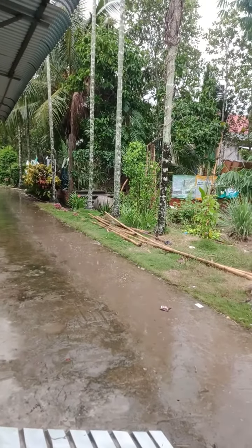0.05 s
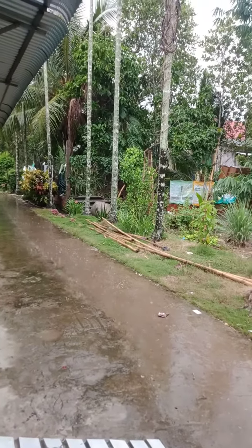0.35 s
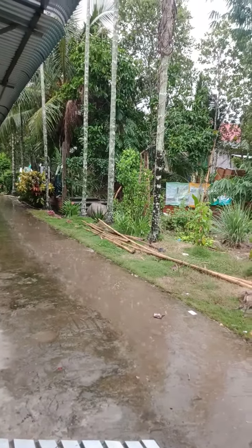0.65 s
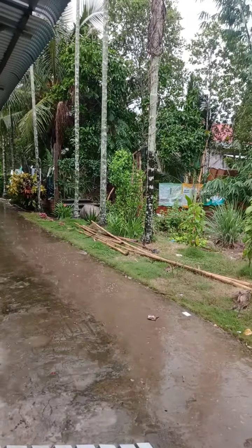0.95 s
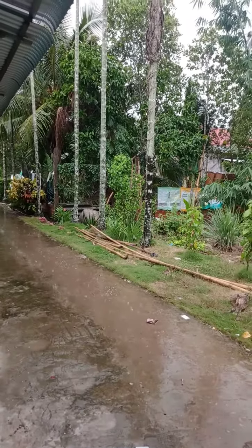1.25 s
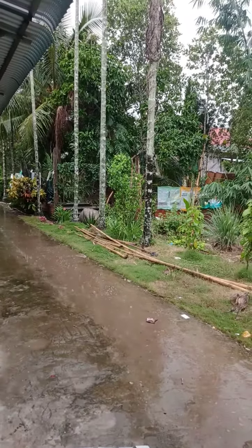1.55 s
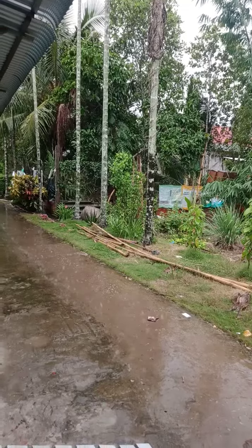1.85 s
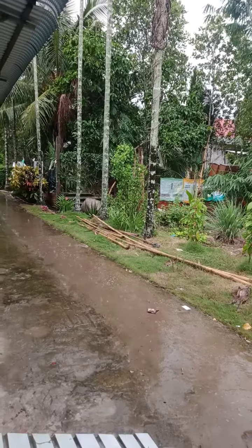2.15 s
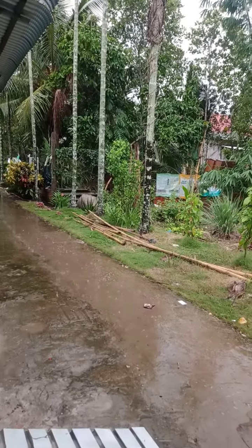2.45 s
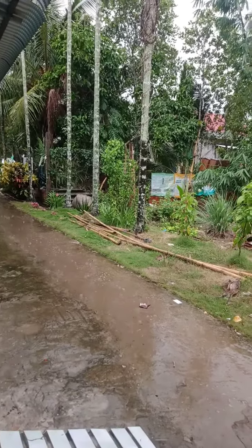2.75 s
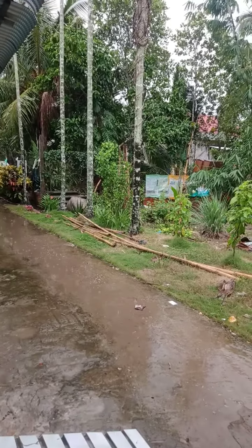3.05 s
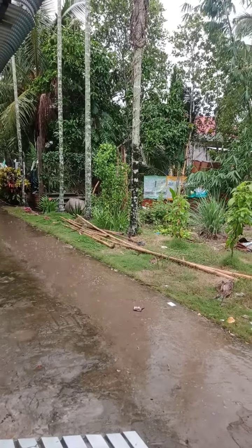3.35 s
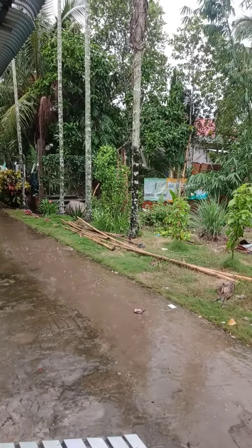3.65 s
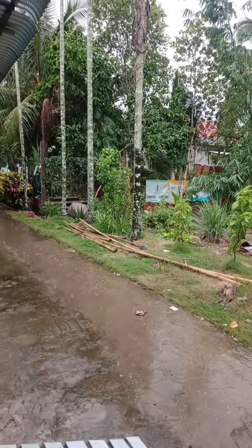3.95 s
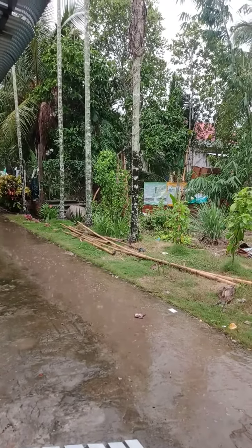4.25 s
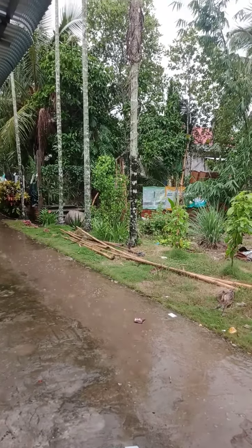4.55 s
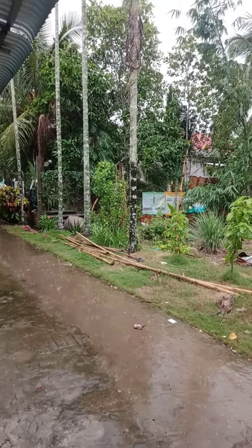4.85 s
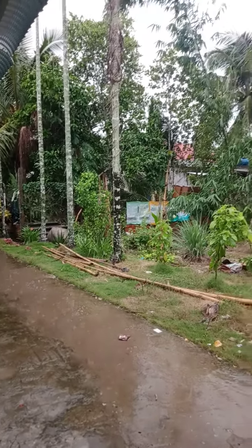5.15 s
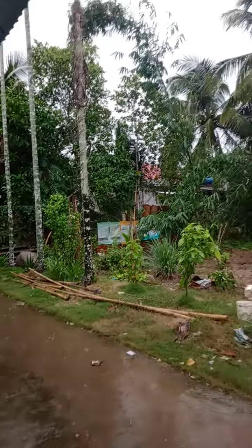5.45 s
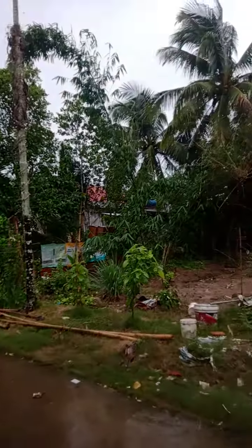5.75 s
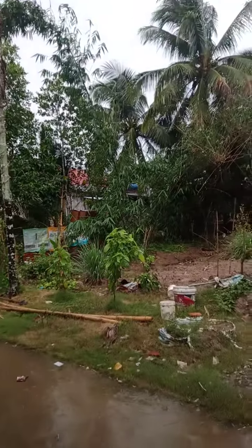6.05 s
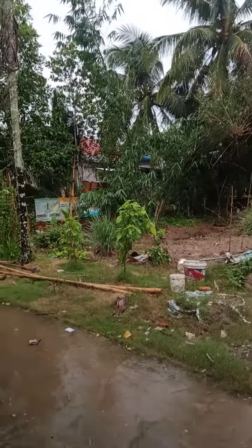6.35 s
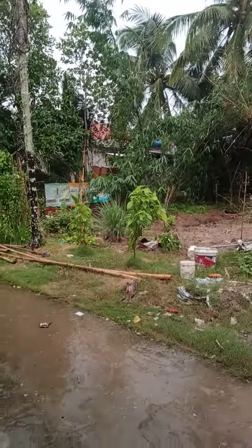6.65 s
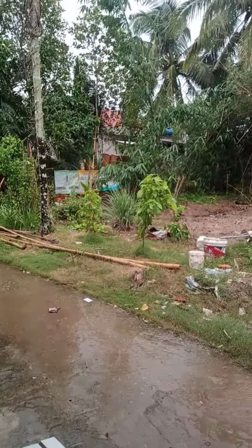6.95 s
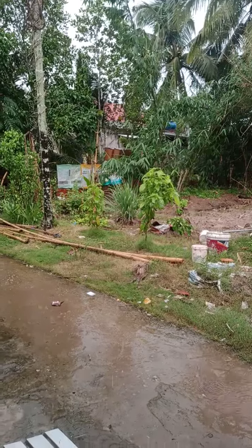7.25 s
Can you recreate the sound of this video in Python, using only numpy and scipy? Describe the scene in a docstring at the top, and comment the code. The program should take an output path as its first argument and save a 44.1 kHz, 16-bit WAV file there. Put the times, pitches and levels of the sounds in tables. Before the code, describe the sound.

From beneath the edge of a metal roof, a shower makes a dense, lightly ringing patter throughout. Heavier drips strike the sheet and burst into spray. Out in the yard, rain hisses gently on leaves and wet paving, and occasional drops plink into standing water. A little past halfway, three soft, dull booms rise out of a faint rumble and fade as the rain carries on.

```python
"""Steady rain drumming on a corrugated metal roof, heard from under its edge, facing a wet yard.
Countless small drops tap the sheet, which rings broadly near 2 kHz; fat drips land on it and spatter.
Behind them lies the wash of rain on ground and leaves, with fine splashes on the puddles,
a few plinks in standing water and a low rumble that swells into three soft booms."""
import sys
import numpy as np
from scipy import signal
from scipy.fft import rfft, irfft
from scipy.io import wavfile

SR = 44100
rng = np.random.default_rng(int(sys.argv[2]) if len(sys.argv) > 2 else 0)


def dump_mix(stems):
    """Bounce the given channels to the path in sys.argv[1] as a 16-bit WAV at rate SR."""
    frames = np.atleast_2d(stems).T  # one column per channel
    limited = np.clip(frames, -1, 1)  # hard clip at full scale
    pcm = np.round(limited * 32767).astype(np.int16)
    wavfile.write(sys.argv[1], SR, pcm)


N = 325899
TIME = np.arange(N) / SR
BIN_HZ = np.fft.rfftfreq(N, 1 / SR)


# small-drop impact spectrum: f/Hz, level/dB
IMPACT_SPECTRUM = [(100, -28.5), (400, -10), (1350, 2.5), (2700, -.5), (4000, -5), (5300, -14.5),
                   (6500, -17), (8400, -26.5), (9700, -39), (12200, -51), (13700, -42), (16000, -46.5)]
# drop classes: rate/(1/s), size spread/dB, ring/dB, impact/dB, sheet t60/s
DROP_CLASSES = [(6996, 1.4, -25, -30, 0.12), (495, 2.9, -29.5, -37.5, 0.21)]

def roof(rain_db, panels=20):
    """Drops strike several panels; each gives a short tap and that panel's longer shiver."""
    ring, impact = np.zeros((2, N))
    for per_s, spread_db, ring_db, impact_db, t60_s in DROP_CLASSES:
        rings, taps = np.zeros((2, N))
        for _ in range(panels):
            drops = patter(per_s / panels, spread_db)
            rings += signal.oaconvolve(drops, shiver(t60_s, rise_s=0.00036))[:N]
            taps += signal.oaconvolve(drops, shiver(t60_s=0.038, rise_s=0.00042))[:N]
        ring += from_db(ring_db) * unit(rings)
        impact += from_db(impact_db) * unit(taps)
    return (colour(ring, sheet_gain()) * from_db(1.16 * rain_db)
            + colour(impact, spectrum(IMPACT_SPECTRUM)) * from_db(0.62 * rain_db))


# roof sheet resonances: f/Hz, width/Hz, level/dB
SHEET_MODES = [(1995, 165, 1.5), (2150, 110, -4), (1800, 415, -3.5), (2440, 430, -10.3), (3660, 660, -18)]

def sheet_gain(damping_hz=4000):
    """Broad resonances of the corrugated metal, damped by the film of water."""
    hz = BIN_HZ + 1
    power = 0
    for mode_hz, width_hz, db in SHEET_MODES:
        detuning = (hz ** 2 - mode_hz ** 2) / (hz * width_hz)
        power += from_db(db) ** 2 / (1 + detuning ** 2)
    return np.sqrt(power / (1 + (hz / damping_hz) ** 10))


# fattest drips on the roof: t/s, ring/dB, spray/dB
FAT_DRIPS = [(0.274, -16, -33.5), (0.303, -18, -40), (0.482, -22, -36), (0.622, -20, -49),
             (1.055, -19, -40), (1.755, -20, -34.5), (2.128, -27, -36.5), (2.628, -24, -36),
             (3.085, -26, -36), (3.203, -24, -38), (3.365, -29, -38), (4.222, -24, -37), (4.428, -19, -35),
             (4.672, -26, -38), (4.970, -19, -30.5), (5.125, -18, -32.5), (5.251, -17.5, -33),
             (5.345, -27, -33), (5.746, -25, -35), (6.095, -25, -47), (6.16, -23, -45), (6.28, -33, -34),
             (6.515, -20.5, -37), (6.9, -20, -32.5)]
# drip spray spectrum: f/Hz, level/dB
SPRAY_SPECTRUM = [(300, -25), (2000, 3.5), (4300, 11), (5400, 6.5), (6400, 3), (8400, -7.5), (9800, -17.5),
                  (12200, -26), (13800, -17), (16000, -18)]

def drips(lesser_per_s=7, lesser_ring_db=-26, lesser_spray_db=-41):
    """Each drip rings the sheet and bursts into grainy spray; lesser ones fall at random."""
    ring, spray = np.zeros((2, N))
    lesser_times_s = np.flatnonzero(rng.random(N) < lesser_per_s / SR) / SR
    lesser = [(start_s, lesser_ring_db, lesser_spray_db) for start_s in lesser_times_s]
    for start_s, ring_db, spray_db in list(FAT_DRIPS) + lesser:
        add(ring, start_s, from_db(ring_db) * shiver(t60_s=0.25, rise_s=0.0013))
        add(spray, start_s, from_db(spray_db) * shiver(t60_s=0.28, rise_s=0.0012))
    droplets = unit(patter(per_s=17000, spread_db=1.5))
    return colour(ring, sheet_gain()) + colour(spray * droplets, spectrum(SPRAY_SPECTRUM))


# spectrum of rain on ground and leaves: f/Hz, level/dB
WASH_SPECTRUM = [(60, -45), (190, -13.5), (220, -3.5), (600, -1.5), (1200, -0.5), (2800, -3.5),
                 (4000, -16.5), (5200, -26), (8300, -36.5), (9700, -48.5), (12200, -55), (13600, -44.5),
                 (16000, -50)]

def yard(rain_db):
    """Far drops on ground and leaves merge into a soft, slightly restless wash."""
    far_drops = unit(patter(per_s=12000, spread_db=2.0)) * from_db(0.16 * wander(per_s=8))
    return colour(far_drops, spectrum(WASH_SPECTRUM)) * from_db(-25.5 + 0.15 * rain_db)


# spectrum of a slap on wet paving: f/Hz, level/dB
SLAP_SPECTRUM = [(500, -17), (3500, 9.5), (6500, -7), (8400, -6), (9800, -20.5), (12200, -19),
                 (14000, -15), (16000, -17)]

def puddles(rain_db, bubble_sizes=16):
    """Near drops slap the wet paving: a brief splash, with a small bubble that rises in pitch."""
    t = np.arange(SR // 3) / SR
    splashes = np.zeros(N)
    for hz in np.geomspace(3200, 8800, bubble_sizes):
        bubble = np.sin(2 * np.pi * hz * t * (1 + 4 * t)) * np.exp(-t * hz / 24)
        splash = unit(shiver(t60_s=0.07, rise_s=0.00056)) + from_db(-10) * unit(bubble)
        splashes += signal.oaconvolve(patter(per_s=7.4, spread_db=4.5), splash)[:N]
    return unit(colour(splashes, spectrum(SLAP_SPECTRUM))) * from_db(-47 + 1.1 * rain_db)


# drips into standing water: t/s, f/Hz, level/dB
WATER_PLINKS = [(0.482, 6400, -45), (1.347, 6500, -45), (2.868, 4300, -32), (2.925, 3800, -34),
                (4.33, 8050, -52), (5.583, 4430, -34), (5.838, 4630, -35)]

def plinks():
    """A drip into standing water gives a short, bright splash around one pitch."""
    out = np.zeros(N)
    for start_s, hz, db in WATER_PLINKS:
        b, a = signal.iirpeak(hz, Q=4.5, fs=SR)
        burst = shiver(t60_s=0.17, rise_s=0.0017)
        splash = signal.lfilter(b, a, signal.lfilter(b, a, burst))
        add(out, start_s, from_db(db) * splash / np.std(splash[:SR // 50]))
    return out


# rumble spectrum: f/Hz, level/dB
RUMBLE_SPECTRUM = [(15, -40), (35, -30), (48, -23), (70, -7.5), (110, -3.5), (145, 0), (185, -4),
                   (320, -7.5), (900, -36.5), (4000, -75)]
# low booms: t/s, level/dB, t60/s
LOW_BOOMS = [(4.21, -30, 0.67), (4.41, -35, 1.6), (5.36, -36.5, 2.1)]

def rumble(floor_db=-43, boom_rise_s=0.028):
    """A dull, wavering rumble; each boom rises quickly and fades slowly."""
    power = from_db(floor_db + 0.5 * wander(per_s=2.2)) ** 2
    for start_s, db, t60_s in LOW_BOOMS:
        age_s = np.maximum(TIME - start_s, 0)
        attack = np.minimum(age_s / boom_rise_s, 1)
        power += (attack * from_db(db - 60 * age_s / t60_s)) ** 2
    return np.sqrt(power) * colour(rng.standard_normal(N), spectrum(RUMBLE_SPECTRUM))


# rain strength about its mean: t/s, level/dB
RAIN_SURGES = [(0.0, -0.2), (0.3, 0), (0.57, -1.4), (1.07, 1.8), (1.22, -1), (1.42, 1), (1.62, -1.3),
               (2.1, -0.7), (2.32, 1.8), (2.5, -0.5), (2.95, 1.5), (3.7, 0), (4.03, 1.6), (4.3, -0.4),
               (5.3, 0.5), (6.5, 0), (6.8, -1.5), (7.39, -0.6)]

def rainfall(flutter_db=0.49):
    """Strength of the rain in dB: slow surges with a quicker random flutter on top."""
    return np.interp(TIME, *np.transpose(RAIN_SURGES)) + flutter_db * wander(per_s=5)


def patter(per_s, spread_db):
    """Clicks at random moments: many small, a few large."""
    size = from_db(spread_db * np.minimum(rng.exponential(1, N), 4))
    return size * rng.choice([-1, 1], N) * (rng.random(N) < per_s / SR)


def shiver(t60_s, rise_s):
    """Dying noise burst: a splash, or an impact's dense echoes from the sheet's ribs and edges."""
    t = np.arange(SR // 3) / SR
    return rng.standard_normal(len(t)) * (1 - np.exp(-t / rise_s)) * from_db(-60 * t / t60_s)


def wander(per_s):
    """Slow random motion of rms 1, up to about the given rate."""
    lowpass = np.exp(-(BIN_HZ / per_s) ** 2)
    return unit(irfft(rfft(rng.standard_normal(N)) * lowpass, N))


def spectrum(points):
    """Gain per frequency bin from (f/Hz, level/dB) points."""
    hz, db = np.transpose(points)
    return from_db(np.interp(np.log(BIN_HZ + 1), np.log(hz), db))


def colour(x, gain):
    """Minimum-phase filter shaped by the gains; keeps the level of white noise."""
    log_gain = np.log(np.maximum(unit(gain), 1e-5))
    cepstrum = irfft(log_gain, N)
    cepstrum[1:N // 2] *= 2
    cepstrum[N // 2:] = 0
    taps = irfft(np.exp(rfft(cepstrum)), N)[:SR // 10]
    return signal.oaconvolve(x, taps)[:N]


def add(mix, start_s, sound):
    """Mixes a sound in at start_s."""
    part = mix[max(round(start_s * SR), 0):][:len(sound)]
    part += sound[:len(part)]


def from_db(db):
    """Decibels to gain."""
    return 10 ** (np.asarray(db) / 20)


def unit(x):
    """Scales to rms 1."""
    return x / np.sqrt(np.mean(x ** 2) + 1e-20)


def scene():
    """Roof overhead, yard in front, under one shower; mono."""
    rain_db = rainfall()
    return (roof(rain_db) + yard(rain_db) + puddles(rain_db) + rumble() + plinks() + drips())[None]


def record(dry):
    """Steep low-pass at 15.75 kHz."""
    taps = signal.firwin(511, 15750, window=("kaiser", 9), fs=SR)
    return signal.oaconvolve(dry, taps[None], "same")


dry = scene()
out = record(dry)
dump_mix(out)
```